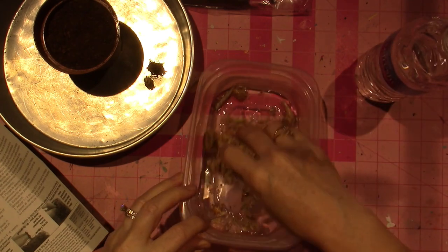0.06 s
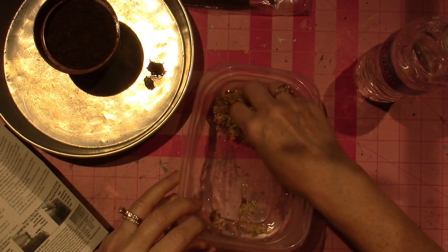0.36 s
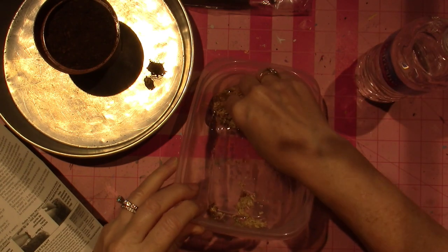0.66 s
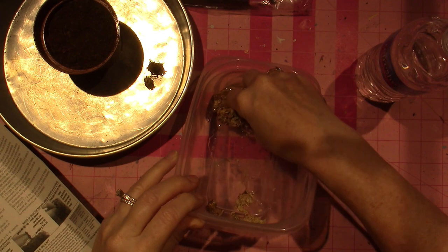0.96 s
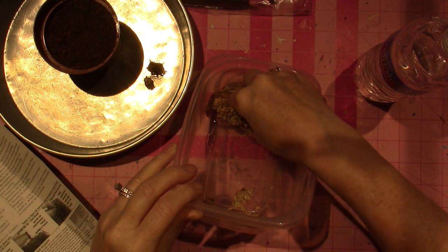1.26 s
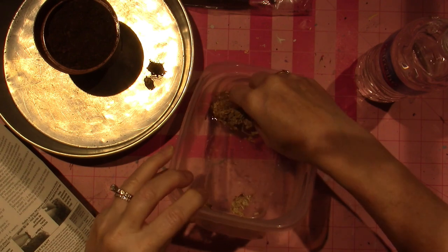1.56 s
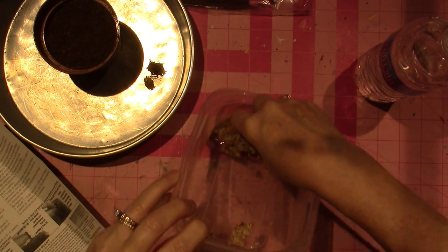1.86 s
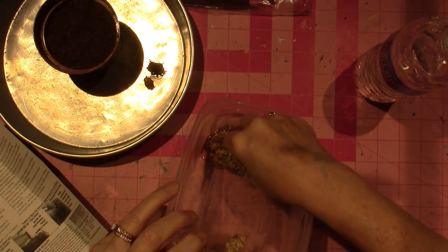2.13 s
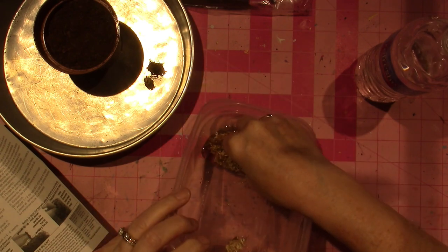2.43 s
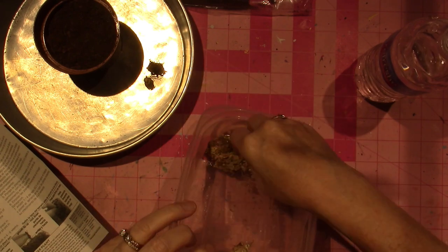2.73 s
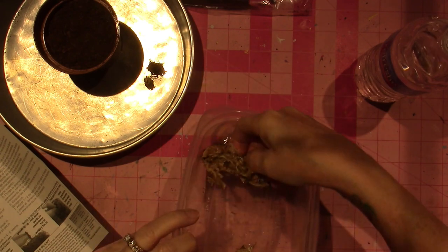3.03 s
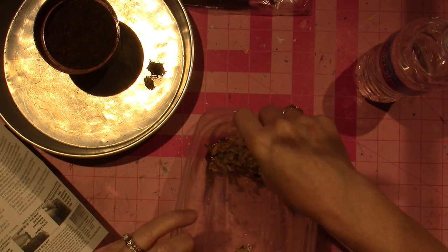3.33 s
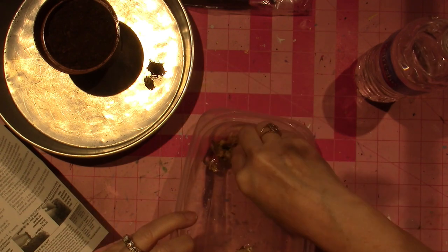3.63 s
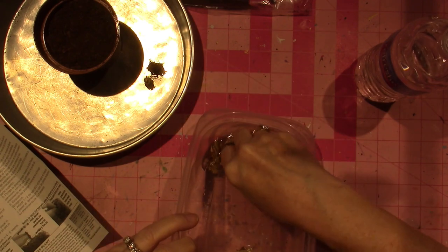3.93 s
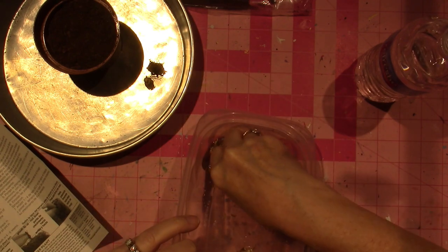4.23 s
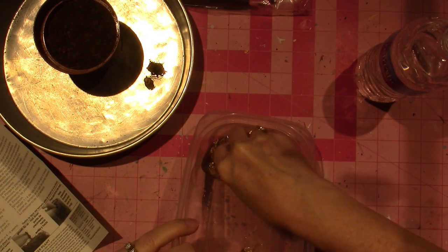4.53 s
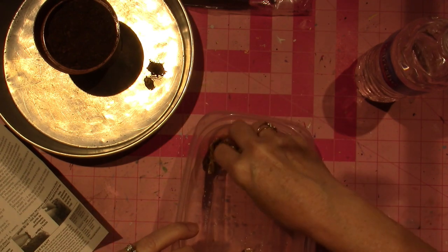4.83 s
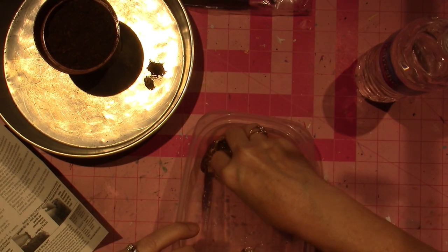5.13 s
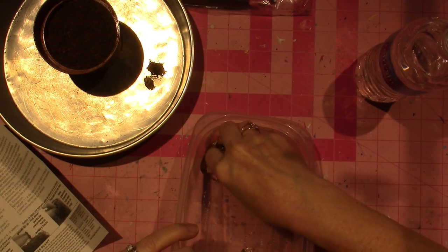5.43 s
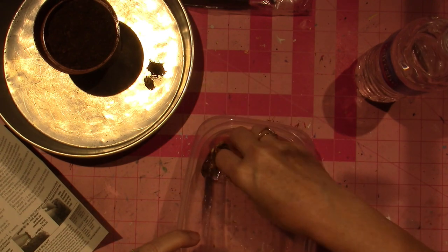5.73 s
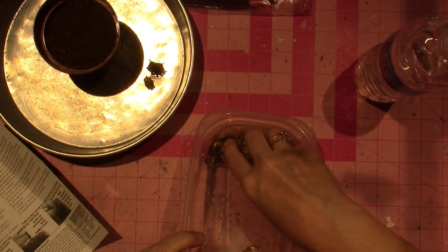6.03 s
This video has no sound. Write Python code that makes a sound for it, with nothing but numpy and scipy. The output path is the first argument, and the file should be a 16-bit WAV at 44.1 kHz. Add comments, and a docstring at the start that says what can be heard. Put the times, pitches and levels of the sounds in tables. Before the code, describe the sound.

A hand squeezes wet moss again and again in a thin plastic tub. Each push swells and relaxes with a soft squelch, a fizz of tiny bubbles and sharp little wet ticks. The tub wall crackles, a fingertip squeaks briefly, then the plastic gives two loud, hollow pops. A cluster of bright ticks follows, and the squeezing grows lighter. The microphone is close above the tub, in a small, quiet room.

```python
"""Wet moss squeezed in a plastic tub

A thin tub on a table in a small room, the microphone close above it. Each squeeze builds, holds and
relaxes: the moss squelches, fizzes and ticks, a wet fingertip squeaks, and the flexing wall pops,
twice loudly. The tub creeps on its mat; behind it lie room murmur, a faint rising hum and a thin whine."""
import sys
import numpy as np
from scipy import signal
from scipy.fft import rfft, irfft, next_fast_len
from scipy.io import wavfile
from scipy.ndimage import uniform_filter1d, map_coordinates

SR = 44100
rng = np.random.default_rng(int(sys.argv[2]) if len(sys.argv) > 2 else 0)


def to_wav(sig):
    """Store sig (one row per channel, or 1-D mono) as 16-bit WAV at the path in sys.argv[1].

    Samples outside -1..1 are clipped; the rate is SR.
    """
    pcm = np.clip(np.atleast_2d(sig), -1, 1) * 32767
    pcm = np.round(pcm).astype(np.int16)
    wavfile.write(sys.argv[1], SR, pcm.T)  # frames by channels


N = 272979
PRESS_S, RELEASE_DB_PER_S = 0.065, 125  # a push builds up, then relaxes

# Spectrum of plastic cracking or being scraped. Each row: frequency in Hz, level in dB.
CRACK_SPECTRUM = [(60, -55), (300, -23), (1500, -7.5), (3500, 17), (7000, -3.5), (9000, -5), (15000, -34)]


def squeezing(seep_db=-68):
    """Gains of rub, squelch and fizz: wet moss fizzes, drained moss rubs, water seeps in between."""
    # Each row: start in seconds, hold in seconds, strength in dB, wetness in dB.
    squeezes = [(.02, .2, -53.5, -0.5), (.315, 0.18, -52, 1), (.53, 0.24, -58, 3.5), (.84, .13, -66, 5),
                (1.13, .26, -63.5, 1), (1.48, 0.28, -56, -1.5), (1.831, .15, -53, -2), (2.03, .1, -58, 1.5),
                (2.2, 0.23, -67.5, 2), (2.6, 0.096, -56.5, 2.5), (2.72, .1, -53.5, -1.5),
                (2.88, 0.13, -65.5, 6.5), (3.11, 0.074, -54.5, 3.5), (3.575, .23, -55, 0),
                (3.615, .025, -51, 6.5), (3.88, 0.23, -62, 2), (4.2, .12, -66.5, 0), (4.64, 0.1, -58.5, -2),
                (4.82, 0.041, -56.5, 1.5), (4.98, .04, -56, 1.5), (5.08, 0.15, -63.5, 2.5),
                (5.39, .05, -63.5, -3), (5.66, 0.053, -59, -4.5), (5.74, 0.077, -57.5, -1.5),
                (6.045, .025, -57, 0.5), (6.15, .05, -63, -6.5)]
    grips = np.array([envelope(start, hold, PRESS_S, RELEASE_DB_PER_S) for start, hold, _, _ in squeezes])
    gains = amp([(db - wet_db, db, db + wet_db) for _, _, db, wet_db in squeezes])
    return np.sqrt(gains.T ** 2 @ grips ** 2 + amp(seep_db) ** 2)


def moss(rub_gain, squelch_gain, fizz_gain):
    """Fingers rub the tub, water squelches through the stems and tiny bubbles burst."""
    # The three spectra. Each row: frequency in Hz, level in dB.
    rub_spectrum = [(40, -60), (150, -26), (400, -2), (800, -5.5), (1500, -4), (2300, -16), (5000, -38)]
    squelch_spectrum = [(150, -70), (900, -13), (2000, -0.5), (3000, 1.5), (4600, -0.5), (6200, -7.5),
                        (9000, -8), (15000, -40)]
    fizz_spectrum = [(500, -82), (3500, -14), (6500, -7.5), (8800, -4), (11000, -4), (13000, -10.5),
                     (15500, -13)]
    rub = cavities(crackle(rub_spectrum, per_s=500, spread_db=2, hiss=1.0, clump_db=4.5), 2.5)
    squelch = cavities(crackle(squelch_spectrum, per_s=700, spread_db=3.5, hiss=0.87, clump_db=2), 4.5)
    fizz = cavities(crackle(fizz_spectrum, per_s=800, spread_db=1.5, hiss=0.68, clump_db=3), 2.5)
    return amp(-2) * rub_gain * rub + squelch_gain * squelch + amp(-1.5) * fizz_gain * fizz


def crackle(spectrum, per_s, spread_db, hiss, clump_db):
    """Tiny snaps of uneven size, in clumps, over a hiss of still finer ones."""
    clicks = (rng.random(N) < per_s / SR) * rng.choice([-1, 1], N)
    sizes = amp(spread_db * np.minimum(rng.exponential(size=N), np.pi))
    grains = unit(clicks * sizes) + hiss * rng.standard_normal(N)
    clumps = amp(clump_db * np.tanh(wobble(90)))
    return coloured(grains * clumps, spectrum)


def cavities(x, depth_db):
    """Small wet cavities open and close, so resonances come and go."""
    spectra = signal.stft(x, nperseg=512)[2]
    patches = uniform_filter1d(rng.standard_normal(spectra.shape), size=4, axis=0)
    patches = uniform_filter1d(patches, size=7, axis=1)
    gain = amp(depth_db * np.tanh(unit(patches)))
    return unit(signal.istft(spectra * gain, nperseg=512)[1][:N])


def ticks(grip, typical_hz=7500, snap_t60=0.003, spray_t60=0.024, body_t60=0.0077):
    """A water film or stem snaps, rings briefly, nudges the plastic under it and leaves a spray."""
    # The loudest snaps. Each row: start in seconds, level in dB, pitch in Hz.
    loud_ticks = [(.156, -31, 8800), (.4459, -27.5, 6600), (.5785, -36, 8050), (.7305, -28, 7600),
                  (.758, -33, 7000), (.9299, -36.5, 10300), (0.979, -37, 7660), (1.3116, -32.5, 8300),
                  (1.9284, -33.5, 5200), (2.182, -27, 11400), (2.6864, -27, 10240), (3.1027, -32, 6000),
                  (3.6194, -19, 9600), (3.6234, -19, 9100), (3.6303, -31, 8200), (3.663, -24.5, 9500),
                  (3.673, -27, 9000), (3.7152, -32, 6300), (3.7391, -37, 4240), (3.8047, -23.5, 8860),
                  (3.836, -32.5, 8060), (3.9656, -38, 5060), (4.0226, -34.5, 8900), (4.351, -36, 6700),
                  (4.4804, -32.5, 11000), (5.3744, -29, 6300), (6.0483, -33.5, 4200)]
    out, t = np.zeros(N), np.arange(SR // 25) / SR
    onset = 1 - np.exp(-t / 0.00017)
    for start, db, hz in loud_ticks + faint_ticks(grip, typical_hz):
        band = lambda f: 1 / (1 + ((f - hz) / (hz / 2)) ** 2)
        hiss = unit(filtered(rng.standard_normal(len(t)), band))
        snap = (np.sin(2 * np.pi * hz * t) + 0.77 * hiss) * fade(t, snap_t60)
        spray = amp(-19) * hiss * fade(t, spray_t60)
        body_hz = 1900 * np.exp(0.313 * rng.standard_normal())
        body_db = -14.5 - 11 * np.log2(hz / typical_hz)  # higher snaps are smaller and nudge less
        body = amp(body_db) * np.sin(2 * np.pi * body_hz * t) * fade(t, body_t60)
        add(out, start, amp(db) * (snap + spray + body) * onset)
    return out


def faint_ticks(grip, typical_hz, count=50):
    """Small snaps at random moments, their level following the squeeze."""
    at = rng.integers(N, size=count)
    size, pitch = rng.standard_normal((count, 2)).T
    db = 20 * np.log10(grip[at]) + 12.5 + 2.2 * size
    return list(zip(at / SR, db, typical_hz * np.exp(0.27 * pitch)))


def pops(sharp_swell_s=0.00044, crack_t60=0.01, thud_t60=0.19):
    """The wall buckles with a crack and a short pitched burst; tub and table thud and ring on."""
    # Wall and floor flexing. Each row: start in seconds, level in dB, pitch in Hz, swell in seconds.
    flexes = [(.417, -31.5, 1430, 0.00044), (0.4225, -29, 1200, .0005), (.429, -27, 2300, 0.00076),
              (1.1205, -42, 1210, 0.00078), (1.183, -28, 1130, 0.00082), (1.198, -28.5, 1050, 0.0004),
              (1.2107, -28, 1110, 0.00048), (1.2195, -26, 1010, 0.00051), (1.2445, -26, 1030, 0.00052),
              (1.59, -12, 1061, 0.0042), (1.592, -34.5, 176, 0.0053), (1.6027, -23, 1690, 0.00071),
              (1.8405, -31, 1110, 0.00056), (1.9282, -27.5, 2400, 0.00045), (2.3582, -15.5, 1015, 0.00097),
              (2.3615, -11.5, 1086, 0.0022), (3.068, -28.5, 960, 0.00094), (3.072, -28.5, 1180, 0.00087),
              (3.1025, -29, 1300, .00046), (3.11, -31.5, 670, 0.0013), (4.7, -36.5, 1400, 0.00074),
              (4.738, -37, 1390, .00055), (5.169, -38.5, 1300, 0.00048), (5.789, -35, 1430, 0.00073),
              (6.0442, -36, 1430, 0.00056), (6.089, -31.5, 1020, 0.00089)]
    # Modes of the tub on the table. Each row: frequency in Hz, level in dB, t60 in seconds.
    tub_modes = [(141.6, -19, 0.87), (162.7, -5, 0.23), (192.5, -12.5, 0.8), (267, -4, 0.3),
                 (345, -16.5, 0.57), (437, -14.5, 0.45), (553, -8.5, 0.22), (736, 1.5, 0.12),
                 (873, -9, 0.35), (930, -19, .25), (1009, 7.5, 0.12), (1074, -2, 0.42), (1140, -21, 0.36),
                 (1170, -6.5, 0.36), (1315, -15, 0.33), (1392, -8, 0.25), (1870, -10, .12),
                 (1920, -12, .15)]
    # The thud's spectrum. Each row: frequency in Hz, level in dB.
    thud_spectrum = [(20, -40), (40, -8), (90, -43), (150, -1), (300, -7), (550, -5), (850, 2.5),
                     (1300, -8.5), (2000, -10.5), (3000, -34), (8000, -41)]
    bursts, rings, t = np.zeros(N), np.zeros(N), np.arange(SR // 2) / SR
    onset = 1 - np.exp(-t / 0.001)
    for start, db, hz, swell_s in flexes:
        swell = (t / swell_s * np.exp(1 - t / swell_s)) ** 4
        buckle = swell * np.sin(2 * np.pi * hz * t)
        crack_db = -6.5 - 14.5 * np.log2(swell_s / sharp_swell_s)  # a slower swell cracks less
        crack = coloured(rng.standard_normal(len(t)), CRACK_SPECTRUM) * fade(t, crack_t60)
        add(bursts, start, amp(db) * (buckle + amp(crack_db) * crack))
        modes = sum(amp(level + rng.normal(0, 0.83)) * np.sin(2 * np.pi * (f * t + rng.random()))
                    * fade(t, t60) for f, level, t60 in tub_modes)
        thud = coloured(rng.standard_normal(len(t)), thud_spectrum) * fade(t, thud_t60)
        ring_db = -8 + 1.753 * db  # hard pops shake tub and table far more
        add(rings, start, amp(ring_db) * (amp(-4.5) * modes + amp(-2) * thud) * onset)
    return bursts, rings


def squeak(rise_hz=650):
    """A wet fingertip sticks and slips on the plastic some three thousand times a second."""
    # Brief slides. Each row: start in seconds, hold in seconds, level in dB, pitch in Hz.
    slides = [(1.184, 0.0044, -20, 3280), (1.194, 0.0019, -33, 3400), (1.206, 0.0029, -33, 3700),
              (1.218, 0.0044, -36, 3750)]
    # Each row: multiple of the pitch, level in dB.
    harmonics = [(1, -7.5), (2, -6.5), (3, -18), (4, -34)]
    out, t = np.zeros(N), np.arange(N) / SR
    waver = 1 + 0.083 * wobble(900)
    scrape = 0.2 * coloured(rng.standard_normal(N), CRACK_SPECTRUM)
    for start, hold, db, hz in slides:
        rise = rise_hz * np.clip((t - start) / hold - .5, -.5, 1)  # the finger speeds up
        phase = 2 * np.pi * np.cumsum((hz + rise) * waver) / SR
        tone = sum(amp(level) * np.sin(k * phase) for k, level in harmonics)
        out += amp(db) * envelope(start, hold, attack=0.0005, release_db_per_s=5500) * (tone + scrape)
    return out


def creep(grip_db=3.5):
    """Fine slips of the tub's foot on the mat sound through its hollow."""
    # Each row: start in seconds, hold in seconds, level in dB.
    pushes = [(0.203, 0.23, -59.5), (5.3, 0.28, -57.5), (5.826, 0.13, -62)]
    # The pressed tub's resonances. Each row: centre in Hz, width in Hz, level in dB.
    resonances = [(327, 55, -5.5), (486, 52, -4), (948, 83, -11), (1430, 71, -14), (1537, 98, -10)]
    push = sum(amp(db) * envelope(start, hold, PRESS_S, RELEASE_DB_PER_S) for start, hold, db in pushes)
    hollow = lambda f: sum((-1) ** k * amp(db) * 1j * f * width / (hz * hz - f * f + 1j * f * width)
                           for k, (hz, width, db) in enumerate(resonances))
    friction = rng.standard_normal(N) * amp(grip_db * wobble(40))
    return push * unit(filtered(friction, hollow))


def walls(x, dull_hz):
    """First echoes off nearby surfaces, which scatter the treble away."""
    # Each row: delay in seconds, level in dB.
    echoes = [(.0035, -6.5), (0.0104, -10.5), (.016, -14), (.0188, -20)]
    comb = lambda hz: sum(amp(db) * np.exp(-2j * np.pi * hz * delay) for delay, db in echoes)
    return filtered(x, lambda hz: comb(hz) / (1 + (hz / dull_hz) ** 2))


def room(x, build_s=0.0029, width=0.13):
    """The small room's diffuse tail; each frequency dies at its own speed."""
    # Each row: frequency in Hz, t60 in seconds.
    decay_times = [(120, 0.85), (300, 0.86), (1000, 0.28), (3500, 0.29), (12000, 0.16)]
    hz, t, spectra = signal.stft(rng.standard_normal((2, SR // 2)), SR, nperseg=256)
    tails = signal.istft(spectra * fade(t, along(decay_times, hz)[:, None]), SR, nperseg=256)[1]
    onset = 1 - np.exp(-(np.arange(tails.shape[1]) / SR / build_s) ** 2)
    tails = stereo(tails * [[1], [width]] * onset)
    return signal.fftconvolve(x[None], tails / np.linalg.norm(tails[0]), axes=1)[:, :N]


def background(murmur_db=-57.5, hum_db=-68.5, whine_db=-74.5):
    """The room's murmur with microphone hiss, a faint climbing hum and a wavering whine."""
    # Murmur and hiss. Each row: frequency in Hz, level in dB.
    murmur_spectrum = [(20, -16), (45, -6), (65, -11.5), (95, -5), (200, -0.5), (400, -0.5), (600, -4),
                       (950, -5.5), (1600, -11), (2500, -16), (5000, -21), (10000, -36), (13000, -25.5),
                       (15500, -35)]
    murmur = unit(stereo(coloured(rng.standard_normal((2, N)), murmur_spectrum)))
    hum_hz = 82.5 + 9.5 * np.arange(N) / SR
    hum_gain = amp(hum_db) * envelope(start=.3, hold=0.76, attack=.3, release_db_per_s=15)
    hum = hum_gain * np.sin(2 * np.pi * np.cumsum(hum_hz) / SR)
    whine_gain = amp(whine_db + 2.2 * wobble(5))
    whine_hz = 5450 + 70 * wobble(200)
    whine = whine_gain * np.sin(2 * np.pi * np.cumsum(whine_hz) / SR)
    return amp(murmur_db) * murmur + hum + whine


def stereo(pair):
    """Two unrelated signals mixed to the likeness of the two microphone ports."""
    # Each row: frequency in Hz, left-right likeness (1 is identical).
    likeness = [(40, 0.57), (150, 0.63), (380, 0.55), (950, 0.57), (2400, 0.51), (6000, 0.86), (15000, 1)]
    turn = lambda hz: np.arccos(np.clip(along(likeness, hz), -1, 1)) / 2
    mid, side = filtered(pair, lambda hz: np.array([np.cos(turn(hz)), np.sin(turn(hz))]))
    return np.array([mid + side, mid - side])


def envelope(start, hold, attack, release_db_per_s):
    """Rises over attack up to start, holds, then dies away by 80 dB; times in seconds."""
    out = np.zeros(N)
    end = start + hold + 80 / release_db_per_s
    at = np.arange(max(round((start - attack) * SR), 0), min(round(end * SR), N))
    t = at / SR - start
    out[at] = np.clip(1 + t / attack, 0, 1) * amp(-release_db_per_s * np.maximum(t - hold, 0))
    return out


def fade(t, t60):
    """A decay that loses 60 dB in t60."""
    return np.exp(-np.log(1000) * t / t60)


def wobble(rate):
    """A smooth random curve, rate knots a second."""
    return map_coordinates(rng.standard_normal(int(N * rate / SR) + 4), [np.arange(N) * rate / SR])


def filtered(x, response):
    """x times a response of frequency."""
    n = x.shape[-1]
    padded = next_fast_len(n + 8192)
    return irfft(rfft(x, padded) * response(np.fft.rfftfreq(padded, 1 / SR)), padded)[..., :n]


def coloured(x, spectrum):
    """x shaped by a spectrum in dB, at rms 1."""
    return unit(filtered(x, lambda hz: amp(along(spectrum, hz))))


def along(points, hz):
    """Interpolate (Hz, value) points on a log axis."""
    knots_hz, values = np.transpose(points)
    return np.interp(np.log(hz + 1), np.log(knots_hz + 1), values)


def amp(db):
    """Decibels to gain."""
    return 10 ** (np.asarray(db) / 20)


def unit(x):
    """Scaled to rms 1."""
    return x / np.sqrt(np.mean(x ** 2) + 1e-20)


def add(track, start, sound):
    """Mix a sound into the track from start, in seconds."""
    part = track[max(round(start * SR), 0):][:len(sound)]
    part += sound[:len(part)]


def scene():
    """The tub sits close under the microphone, the moss in the centre and the room around it."""
    rub_gain, squelch_gain, fizz_gain = squeezing()
    rustle = moss(rub_gain, squelch_gain, fizz_gain) + creep()
    snaps, slip = ticks(squelch_gain), squeak()
    bursts, rings = pops()
    plastic = slip + bursts + rings + walls(bursts + snaps, dull_hz=2620)
    sides = plastic * amp([[.45], [-.45]])  # a little to the left
    tails = amp(-14.5) * room(rustle + snaps) + amp(-4.5) * room(slip)
    tails += amp(-11.5) * room(bursts, build_s=0.017)
    return rustle + snaps + sides + tails + background()


def record(dry, low_hz=48, treble_hz=14800, top_hz=15900):
    """The microphone sheds deep bass and the highest treble, and keeps nothing above top_hz."""
    colour = lambda hz: (1j * hz / (low_hz + 1j * hz)) ** 2 / np.sqrt(1 + (hz / treble_hz) ** 10)
    return filtered(dry, lambda hz: colour(hz) * (hz < top_hz))


dry = scene()
out = record(dry)
to_wav(out)
```